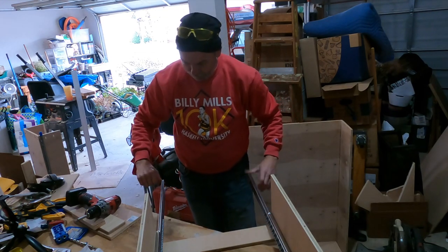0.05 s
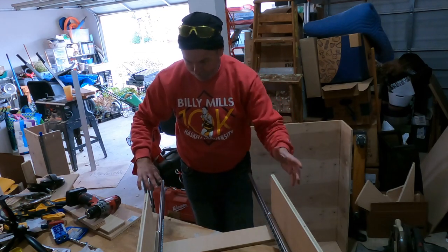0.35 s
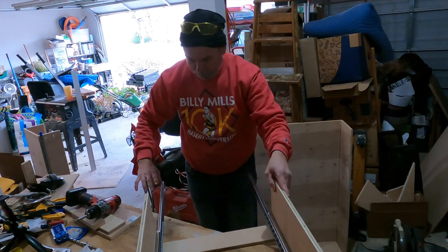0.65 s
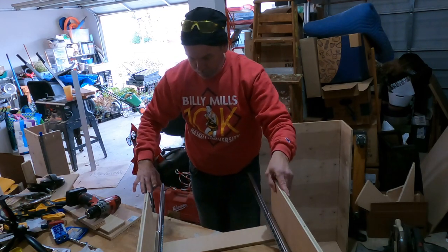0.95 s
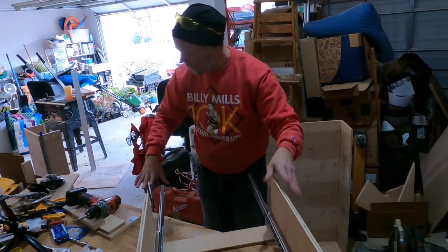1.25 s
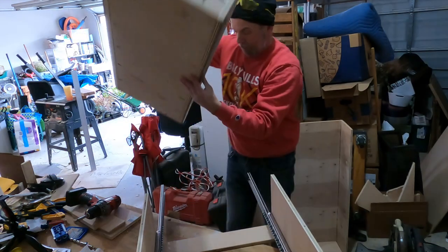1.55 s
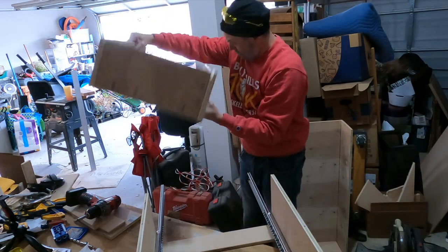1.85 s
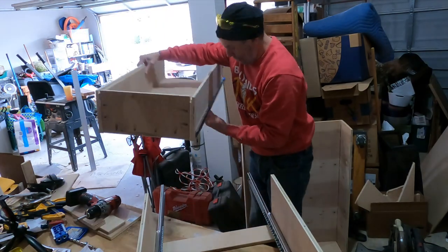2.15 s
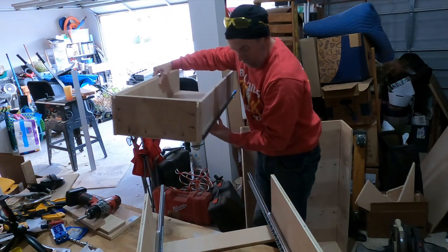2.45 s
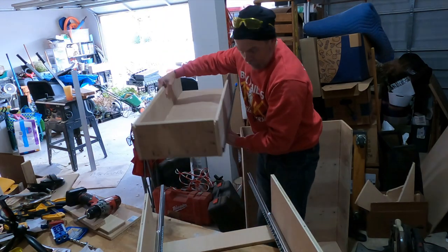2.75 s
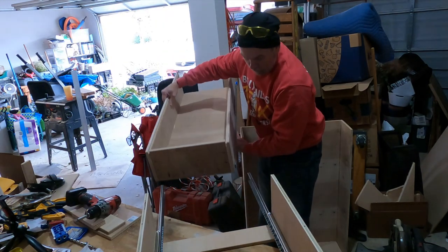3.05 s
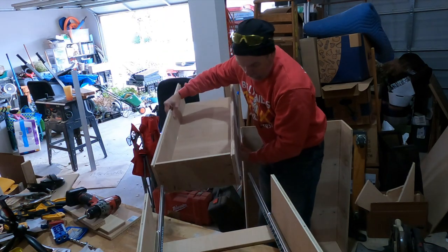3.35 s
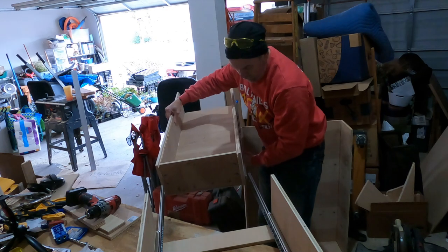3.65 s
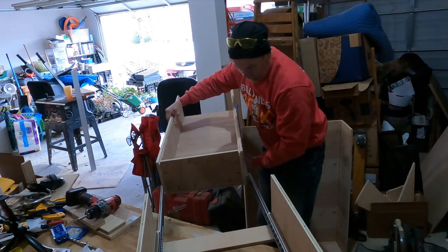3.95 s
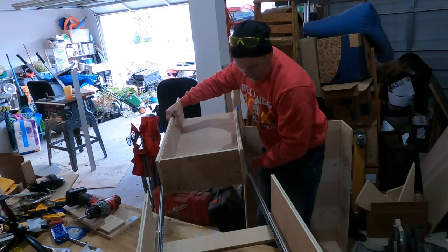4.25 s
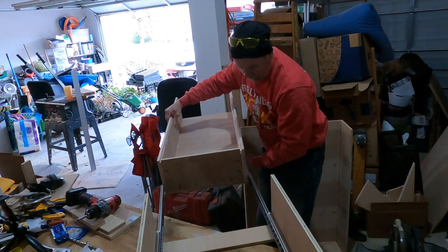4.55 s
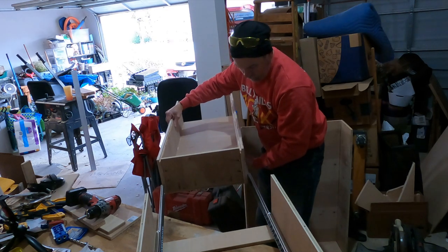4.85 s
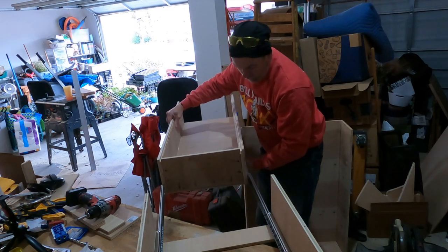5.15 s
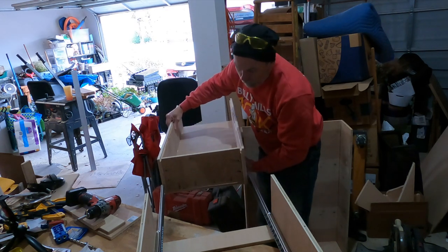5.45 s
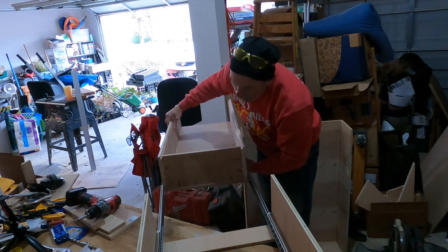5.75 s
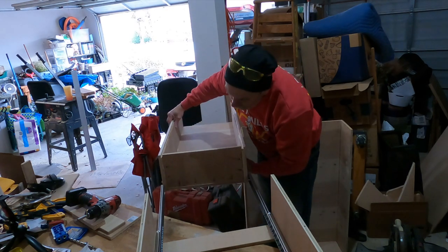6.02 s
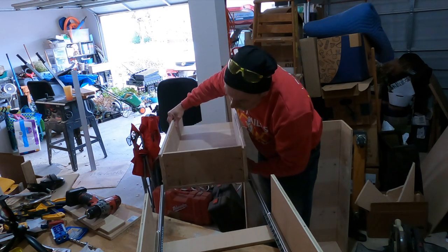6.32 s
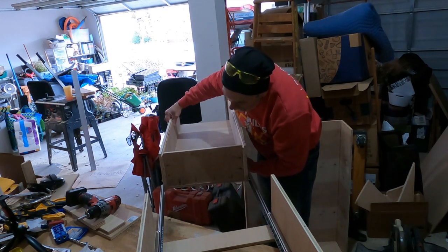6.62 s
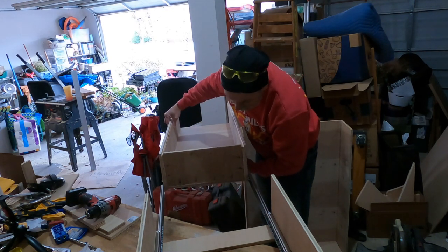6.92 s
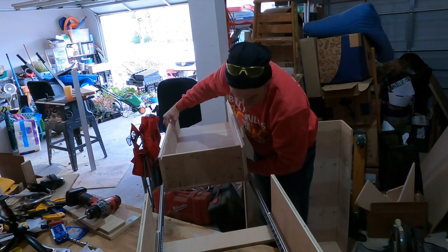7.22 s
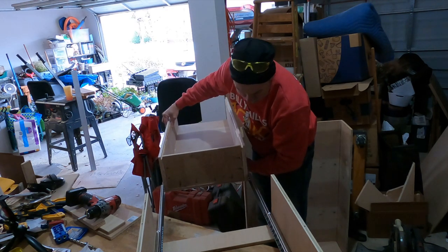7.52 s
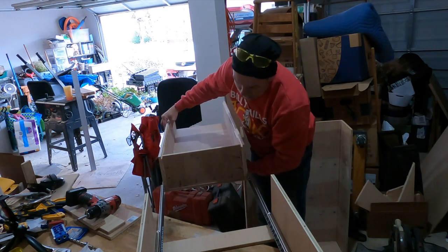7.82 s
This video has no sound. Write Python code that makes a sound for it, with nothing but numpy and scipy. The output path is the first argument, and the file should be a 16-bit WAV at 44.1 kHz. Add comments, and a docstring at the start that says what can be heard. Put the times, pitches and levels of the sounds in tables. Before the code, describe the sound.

Steel drawer slides run out with a short rattling rasp and clack against their stops. Hands then brush softly over a plywood drawer box as it is turned. The box is lined up on the slides with several hollow knocks, small ticks and short scrapes, each push thudding through the workbench. It all sounds fairly close, in a garage with a brief echo and a faint machine hum.

```python
"""Steel drawer slides run out of a cabinet frame, their balls chattering, and clack against their stops.
A plywood drawer box is turned over, hands brushing its faces. As it is lined up on the slides,
its edge sticks and slips in short scrapes, and knocks ring its panels.
Knocks and pushes shake the workbench. A machine hums faintly; the cluttered garage echoes briefly."""
import sys
import numpy as np
from scipy import signal
from scipy.fft import rfft, irfft, next_fast_len
from scipy.io import wavfile
from scipy.ndimage import map_coordinates

SR = 44100
rng = np.random.default_rng(int(sys.argv[2]) if len(sys.argv) > 2 else 0)


def put_to_file(sound):
    """Save the sound as 16-bit audio at rate SR, in the file named by the first command-line argument."""
    columns = np.atleast_2d(sound).T  # one column per channel
    safe = np.clip(columns, -1, 1)
    whole_steps = np.round(safe * 32767)
    wavfile.write(sys.argv[1], SR, whole_steps.astype(np.int16))


N = 347508

# runs of a ball carriage along its slide: start_s, rise_s, hold_s, level_db, treble_db
SLIDE_RUNS = [(0.15, 0.057, 0.012, -59, -9), (0.25, 0.031, 0.065, -76.5, 2),
              (0.358, 0.022, 0.026, -52.5, -3.5), (0.561, 0.0064, 0.071, -44.5, -7.5),
              (0.631, 0.042, 0.071, -42.5, -1.5), (0.946, 0.012, 0.11, -67, -2.5),
              (1.238, 0.062, 0.0051, -51, -6)]
# broad tone of a slide's steel channel: pitch_hz, level_db
STEEL_TONE = [(100, -26.5), (400, -4), (600, 1), (850, -7), (1100, 4.5), (2500, -0.5), (5000, -6.5),
              (6500, -7.5), (8000, -16.5), (11000, -21), (14000, -27.5)]
# narrow rings of that channel: pitch_hz, width_hz, lift_db
STEEL_RINGS = [(1080, 200, 3), (1867, 120, 4.5), (2567, 35, -7), (2870, 80, 5), (3775, 43, 2.5),
               (4270, 56, 8.5), (5460, 61, 6), (5800, 63, -2), (9440, 140, 6.5), (10600, 130, 7)]
# sharp clicks of slide stops, and light ticks from rubbing and dragging the box:
# start_s, level_db, centre_hz, fade_s (time to fall 60 dB)
CLICKS_AND_TICKS = [(.378, -52, 3500, .03), (.566, -25, 1700, 0.03), (0.6004, -26, 4530, .014),
                    (.614, -26.5, 5500, .015), (0.646, -17, 4830, 0.057), (0.679, -11, 4900, 0.12),
                    (.743, -9, 2780, 0.014), (1.269, -40, 2400, .02), (1.291, -33, 2400, .025),
                    (2.463, -50, 11000, .03), (2.475, -41, 9000, 0.032), (2.508, -44, 4970, .03),
                    (4.218, -52, 4300, 0.039), (4.906, -40, 7500, .03), (5.2077, -38, 5300, 0.16),
                    (5.35, -26, 2860, 0.023), (5.759, -34, 3500, 0.031), (6.391, -37.5, 2600, .015),
                    (7.056, -54, 4500, .02), (7.83, -37, 2590, 0.024)]
# rings of a squeaking slide: pitch_hz, width_hz, level_db
SQUEAK_RINGS = [(1630, 260, 1), (2840, 200, -8)]
# dull knocks of the frame as a slide is yanked, and of the plywood box:
# start_s, level_db, treble_db, hollow_db, thud_db, thud_upper_db
DULL_KNOCKS = [(0.576, -34.5, -4, -1, -25, 5.5), (0.632, -34, -9, -8, -30, -23),
               (0.761, -12.5, -30, 4, -16, 5), (1.29, -21.5, -5, 0.5, -32, -19),
               (1.485, -24.5, -5, 7, -61, 6), (3.882, -22, -14.5, 0, -46.5, 0.5),
               (4.221, -34.5, -4, -4, -27, -17), (4.443, -3, -11.5, -4.5, -29, 7.5),
               (4.933, -22, -24, 3, -44.5, 4), (5.246, -2.5, -7.5, 3.5, -27.5, 10),
               (5.27, -19, -23.5, -1, -18, 7.5), (5.35, -8, -14.5, 6, -43.5, 9.5),
               (5.524, -24.5, -14, -0.5, -33.5, 2.5), (6.201, -3, -7, 2.5, -28.5, 3.5),
               (6.338, -20, -15.5, -1.5, -52.5, 0.5), (6.553, -25, -14, 3.5, -46, -11),
               (7.165, -30.5, -14, 8.5, -27.5, 3), (7.506, -35, -11, -6, -60, -2)]
# broad tone of a knock: pitch_hz, level_db
DULL_TONE = [(120, 6.5), (230, 0), (330, -5), (490, -3), (700, -2), (900, -7), (1200, -5.5), (1900, -13),
             (3800, -14.5), (5000, -21.5), (7000, -29), (9000, -40), (14000, -50)]
# rings of the box's panels: pitch_hz, width_hz, lift_db (scaled for knocks and for scrapes)
PANEL_RINGS = [(386, 18, 6), (463, 20, 6), (496, 26, 9), (582, 25, 5), (673, 25, 3), (776, 22, 5),
               (1058, 35, 6), (1141, 40, 5), (1258, 48, 9), (1478, 45, 8), (2190, 35, 4), (2930, 120, 4)]
# pushes that drag the box edge along a slide: start_s, rise_s, hold_s, scrape_db, thud_db
BOX_PUSHES = [(3.87, .027, 0.022, -44, -30.5), (4.844, 0.031, 0.023, -55, -49),
              (4.901, 0.0058, 0.023, -49.5, -36), (5.593, .08, 0.034, -45.5, -24),
              (5.713, 0.023, .04, -45, -26.5), (6.007, .044, 0.043, -49, -28.5),
              (6.103, 0.0088, 0.037, -45, -28), (6.385, 0.0045, 0.079, -48.5, -37.5),
              (6.528, .038, 0.06, -52, -31.5), (7.038, .018, .045, -57, -45),
              (7.161, .005, 0.057, -43.5, -24), (7.28, .04, 0.034, -59.5, -53)]
# broad tone of wood dragged on steel: pitch_hz, level_db
SCRAPE_TONE = [(150, 10.5), (400, -13), (630, 3), (830, -10), (1150, -1.5), (1600, -12.5), (2300, -13),
               (2650, -18.5), (3200, -15), (4100, -18), (5000, -27.5), (6800, -22), (9000, -37),
               (14000, -51)]
# rings of a slide with the box pressed on it: pitch_hz, width_hz, lift_db (scaled in scrapes)
PRESSED_RINGS = [(3300, 69, 0), (3880, 63, 6), (4250, 230, 6), (5780, 150, 9), (6400, 120, 5),
                 (7200, 160, 5.5)]
# palms and sleeves brushing the plywood: start_s, rise_s, hold_s, fade_s, level_db, hiss_db, sheen_db
HAND_STROKES = [(1.487, 0.011, 0.1, 0.28, -49.5, -6, 4.5), (1.493, 0.076, 0.017, 0.39, -55, 3.5, 9.5),
                (1.611, 0.064, 0.037, 0.85, -45, -19, 2), (1.689, .05, 0.037, 0.28, -47, 6, 2.5),
                (1.862, .05, 0.039, 0.77, -52.5, -5, 8.5), (2.052, 0.028, 0.011, 0.32, -44.5, 2.5, 4.5),
                (2.195, .06, .17, 0.65, -75, -7, 12.5), (2.45, 0.054, 0.039, 0.32, -55, -10, -5.5),
                (2.572, 0.041, 0.0043, 0.24, -37.5, -11.5, -5.5),
                (2.581, 0.064, 0.024, 0.23, -44.5, 10, 3.5), (2.752, 0.12, 0.025, 0.21, -42.5, 0, -1.5),
                (3.427, 0.043, 0.016, 0.25, -65, -12, -4), (7.766, 0.068, 0.045, .3, -59, -11, -9)]
# broad tone of that brushing: pitch_hz, level_db
HAND_TONE = [(200, -28.5), (330, -10), (430, -4), (580, 1), (820, -1.5), (1150, 1), (1450, 0), (1750, 2),
             (2300, -0.5), (3900, -3.5), (7000, -15.5), (9000, -25), (12000, -30.5), (14000, -42.5)]
# rings of the air in the open box: pitch_hz, width_hz, level_db
HOLLOW_RINGS = [(433, 49, 1.5), (593, 93, -2), (1012, 45, 2.5), (1247, 86, 3.5), (2050, 290, -1.5)]
# ways the bench top vibrates: pitch_hz, level_db (scaled in scrapes), life_ratio (larger rings longer)
BENCH_MODES = [(48.1, -14, 2.2), (92.5, -1, 1.14), (122.7, -13.5, 1.73), (148.3, -13.5, 2.02),
               (176.3, -12.5, 0.55), (223.2, -16, 1.34), (275.3, -19, 0.29), (353, -39, 1.4),
               (440.2, -30.5, 0.92)]
# tones of the machine's hum: pitch_hz, level_db
HUM_TONES = [(43.1, -59), (58.5, -57), (119, -62.5), (172.8, -52.5), (236.9, -67.5), (259, -61.5),
             (345, -71)]
# broad tone of the room's air: pitch_hz, level_db
ROOM_AIR_TONE = [(18, -15), (45, -2.5), (80, -10), (120, -4.5), (170, -6.5), (205, -9), (260, -11),
                 (380, -26.5), (780, -37.5), (1750, -37.5), (2800, -52.5), (7300, -56), (8600, -67),
                 (14000, -74.5)]
# time the garage's echo takes to fall 60 dB: pitch_hz, fade_s
ECHO_FADE = [(100, 0.86), (500, 0.35), (1500, 0.33), (4000, 0.32), (8000, 0.37), (13000, 0.2)]
# how alike sound from all sides is at the two microphones: pitch_hz, likeness (1 is the same)
STEREO_LIKENESS = [(60, 1), (250, 0.8), (600, 0.83), (1500, .75), (4000, 0.48), (12000, 0.17)]
# how far the left microphone lags the right: pitch_hz, lag_radians
LEFT_LAG = [(60, 0.022), (250, 0.41), (860, 0.95), (2500, 0.97), (5000, 0.65), (13000, 0.33)]

SQUEAK_AT_S, SQUEAK_WIDTH_S, SQUEAK_DB = 1.294, 0.0062, -40.5
HOLLOW_DB, HOLLOW_GROWTH = -26.5, 0.66  # the box's hum grows more slowly than the brushing
THUD_DELAY_S = 0.0024  # a knock travels down the frame to the bench
# a thud's base length at a given level, and how much harder a jolt halves it
THUD_S, THUD_AT_DB, THUD_HALVING_DB = 0.066, -27.5, 16.5
TOP_HZ = 13700


def slides():
    """Balls chatter unevenly along the steel channels; a faster run is brighter."""
    chatter = grit(rate=800, spread_db=2.0, smooth=1.0) * amp(2.3 * wobble(150))
    rasp = unit(coloured(chatter, steel_db))
    highs = filtered(rasp, lambda hz: treble(hz, corner_hz=3000))
    out = np.zeros(N)
    for start, rise, hold, db, treble_db in SLIDE_RUNS:
        gain = amp(db) * movement(start, rise, hold, fade_s=0.2)
        out += gain * (rasp - highs + highs * amp(treble_db))
    return in_garage(out, echo_db=-6.5)


def clicks():
    """Slide stops click and the rubbed or dragged box ticks: each is a short crack with a bright ring."""
    out = np.zeros((2, N))
    for start, db, centre_hz, fade_s in CLICKS_AND_TICKS:
        tone = lambda hz: steel_db(hz) - np.minimum(8 * np.log2((hz + 1) / centre_hz) ** 2, 40)
        add(out, start, amp(db) * coloured(blow(fade_s, echo_db=-6.0), tone))
    return out


def squeak():
    """A slide sticks and sings for an instant as the hand lets go."""
    song = ringing_noise(SQUEAK_RINGS)
    swell = np.exp(-((np.arange(N) / SR - SQUEAK_AT_S) / SQUEAK_WIDTH_S) ** 2)
    return in_garage(amp(SQUEAK_DB) * song * swell, echo_db=-15)


def knocks():
    """Each blow rings the frame or box; a harder contact is brighter, a flatter one more hollow."""
    out = np.zeros((2, N))
    for start, db, treble_db, hollow_db, _, _ in DULL_KNOCKS:
        tone = lambda hz: (along(DULL_TONE, hz) + 1.03 * peaks(PANEL_RINGS, hz)
                           + treble_db * treble(hz, corner_hz=2200)
                           + hollow_db * (1 - treble(hz, corner_hz=745)))
        add(out, start, amp(db) * coloured(blow(fade_s=0.041, echo_db=2.5), tone))
    return out


def scrapes():
    """The box edge sticks and slips along a slide, and the bench shudders under it."""
    force = sum(amp(db) * movement(start, rise, hold, fade_s=0.12)
                for start, rise, hold, db, _ in BOX_PUSHES)
    # a scrape rings the panels less deeply than a free blow
    tone = lambda hz: along(SCRAPE_TONE, hz) + .5 * peaks(PANEL_RINGS, hz) + .97 * peaks(PRESSED_RINGS, hz)
    slips = coloured(grit(rate=500, spread_db=-0.5, smooth=0.88), tone) * amp(4.5 * wobble(70))
    bench_gain = lambda hz: sum(amp(0.23 * db) / (1 + 1j * (hz - pitch) * 0.91 * life)
                                for pitch, db, life in BENCH_MODES)
    shudder = filtered(rng.standard_normal(N), bench_gain)
    return in_garage(force * unit(slips), echo_db=-2.5) + amp(-5.0) * force * unit(shudder)


def hands():
    """Skin and cloth hiss over the grain; fast strokes are brighter, light ones sound more hollow."""
    tone = lambda hz: along(HAND_TONE, hz) + peaks(HOLLOW_RINGS, hz)
    rub = unit(coloured(grit(rate=1200, spread_db=-0.5, smooth=0.64), tone))
    hiss = filtered(rub, lambda hz: treble(hz, corner_hz=2120))
    sheen = filtered(rub, lambda hz: treble(hz, corner_hz=5470) ** 2)  # the very highest hiss
    brushing, force = np.zeros(N), np.zeros(N)
    for start, rise, hold, fade_s, db, hiss_db, sheen_db in HAND_STROKES:
        gain = amp(db) * movement(start, rise, hold, fade_s)
        brushing += gain * (rub - hiss + (hiss - sheen) * amp(hiss_db) + sheen * amp(sheen_db))
        force += gain
    hollow = amp(HOLLOW_DB) * force ** HOLLOW_GROWTH * ringing_noise(HOLLOW_RINGS)
    return in_garage((brushing + hollow) * amp(0.57 * wobble(45)), echo_db=-4.0)


def bench():
    """Every knock jolts the workbench, and so does every push as it reaches full force."""
    out = np.zeros(N)
    for start, _, _, _, db, upper_db in DULL_KNOCKS:
        add(out, start + THUD_DELAY_S, thud(db, upper_db))
    for start, rise, _, _, db in BOX_PUSHES:
        add(out, start + rise, thud(db, upper_db=1))
    return filtered(out, lambda hz: treble(hz, corner_hz=28))  # the top gives off little deep bass


def thud(db, upper_db):
    """The bench top booms for a few cycles; its load stills a hard jolt sooner than a soft one."""
    t = np.arange(SR // 2) / SR
    length_s = THUD_S * 2 ** ((THUD_AT_DB - db) / THUD_HALVING_DB)
    legs = amp(-22.5 - 60 * t / 1.13)  # the legs ring on faintly
    boom = 0
    for hz, mode_db, life in BENCH_MODES:
        chance_db, phase = rng.normal(0, [0.71, 0.82])
        gain = amp(mode_db + chance_db + upper_db * treble(hz, corner_hz=130))
        fade = np.exp(-(t / (length_s * life)) ** 2) + legs
        boom += gain * fade * np.sin(2 * np.pi * hz * t + phase)
    return amp(db) * boom * (1 - np.exp(-t / 0.0012))


def background():
    """Room air and the slightly unsteady hum of a machine."""
    t = np.arange(N) / SR
    air = unit(filtered(all_round_noise(N), lambda hz: amp(along(ROOM_AIR_TONE, hz))))
    hum = 0
    for hz, db in HUM_TONES:
        gain = np.sqrt(2) * amp(db + 1.06 * wobble(2.62))
        hum += gain * np.sin(2 * np.pi * hz * t + .5 * wobble(5))
    return amp(-49.0) * air + hum


def garage_echo():
    """The room's stereo answer to a click; the highest treble dies first."""
    hz, t, spectrum = signal.stft(all_round_noise(SR // 2), SR, nperseg=256)
    fade = amp(-60 * t / along(ECHO_FADE, hz)[:, None])
    echo = signal.istft(spectrum * fade, SR, nperseg=256)[1]
    return np.pad(echo / np.linalg.norm(echo[0]), ((0, 0), (SR // 400, 0)))


def in_garage(x, echo_db):
    """Direct sound plus the room's echo, at about the same overall level."""
    echo = signal.fftconvolve(x[None], garage_echo(), axes=1)[:, :len(x)]
    return (x + amp(echo_db) * echo) / np.hypot(1, amp(echo_db))


def blow(fade_s, echo_db):
    """A brief crunch of contact followed by the room's echo."""
    echo = garage_echo()
    t = np.arange(echo.shape[1]) / SR
    crunch = rng.standard_normal(len(t)) * (1 - np.exp(-t / .001)) * amp(-60 * t / fade_s)
    return crunch / np.linalg.norm(crunch) + amp(echo_db) * echo


def grit(rate, spread_db, smooth):
    """Tiny contacts of uneven size, rate a second, over smooth rubbing noise."""
    contacts = (rng.random(N) < rate / SR) * amp(spread_db * np.clip(rng.standard_normal(N), -2, 2))
    return unit(contacts * np.sign(rng.standard_normal(N))) + smooth * rng.standard_normal(N)


def ringing_noise(rings):
    """Noise that sings at the given rings."""
    gain = lambda hz: sum(amp(db) / (1 + 2j * (hz - pitch) / width) ** 2 for pitch, width, db in rings)
    return unit(filtered(rng.standard_normal(N), gain))


def all_round_noise(size):
    """Stereo noise arriving from all sides, most alike in the bass."""
    angle = lambda hz: np.arccos(np.clip(along(STEREO_LIKENESS, hz), 0, 1)) / 2
    shares = lambda hz: np.array([np.cos(angle(hz)), np.sin(angle(hz))])
    mid, side = filtered(rng.standard_normal((2, size)), shares)
    return np.array([mid + side, mid - side])


def movement(start_s, rise_s, hold_s, fade_s):
    """Gain of one movement: it gathers speed, holds, then falls 60 dB in fade_s."""
    t = np.arange(N) / SR - start_s
    return np.clip(t / rise_s, 0, 1) ** 2 * amp(-60 * np.clip((t - rise_s - hold_s) / fade_s, 0, 2))


def wobble(rate):
    """A smooth curve through random points, rate a second."""
    return map_coordinates(rng.standard_normal(int(N * rate / SR) + 4), [np.arange(N) * rate / SR])


def steel_db(hz):
    """How strongly a slide's steel channel answers at each pitch."""
    return along(STEEL_TONE, hz) + peaks(STEEL_RINGS, hz)


def peaks(rings, hz):
    """Lift in dB around each ring's pitch."""
    return sum(db / (1 + (2 * (hz - pitch) / width) ** 2) for pitch, width, db in rings)


def treble(hz, corner_hz):
    """A smooth step from 0 below the corner to 1 above it."""
    return hz ** 4 / (hz ** 4 + corner_hz ** 4)


def along(points, hz):
    """Read between a table's points, with octaves evenly spaced."""
    pitches, values = np.transpose(points)
    return np.interp(np.log(hz + 1), np.log(pitches), values)


def filtered(x, response):
    """Scale each frequency of x by response(hz)."""
    size = x.shape[-1]
    padded = next_fast_len(size + SR // 4)
    return irfft(rfft(x, padded) * response(np.fft.rfftfreq(padded, 1 / SR)), padded)[..., :size]


def coloured(x, tone, size=8192):
    """Give x the shape tone(hz), in dB; only the shape counts, not its overall level."""
    cepstrum = irfft(np.log(amp(tone(np.fft.rfftfreq(size, 1 / SR)))))
    # fold it so that the ringing comes after each hit, never before
    cepstrum[1:size // 2] *= 2
    cepstrum[size // 2 + 1:] = 0
    ring = irfft(np.exp(rfft(cepstrum)))
    rung = signal.fftconvolve(np.atleast_2d(x), ring[None] / np.linalg.norm(ring), axes=1)
    return rung[:, :x.shape[-1]].reshape(x.shape)


def add(track, start_s, sound):
    """Mix a sound into the track."""
    part = track[..., round(start_s * SR):][..., :sound.shape[-1]]
    part += sound[..., :part.shape[-1]]


def amp(db):
    """Decibels to gain."""
    return 10 ** (np.asarray(db) / 20)


def unit(x):
    """Scale to an average (rms) level of 1."""
    return x / np.sqrt(np.mean(x ** 2) + 1e-20)


def scene():
    """All the sources together, a little louder on the left."""
    mix = slides() + clicks() + squeak() + hands() + scrapes() + knocks() + bench() + background()
    return mix * amp([[.8], [-.8]])


def record(dry):
    """The left microphone hears slightly later; nothing is kept above TOP_HZ."""
    sides = np.array([[-1], [1]])
    return filtered(dry, lambda hz: (hz < TOP_HZ) * np.exp(.5j * along(LEFT_LAG, hz) * sides))


dry = scene()
out = record(dry)
put_to_file(out)
```